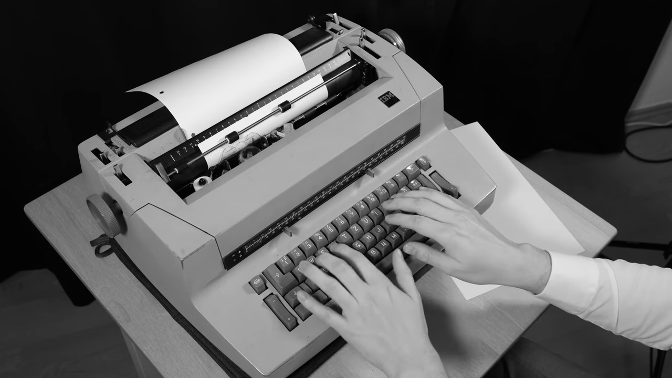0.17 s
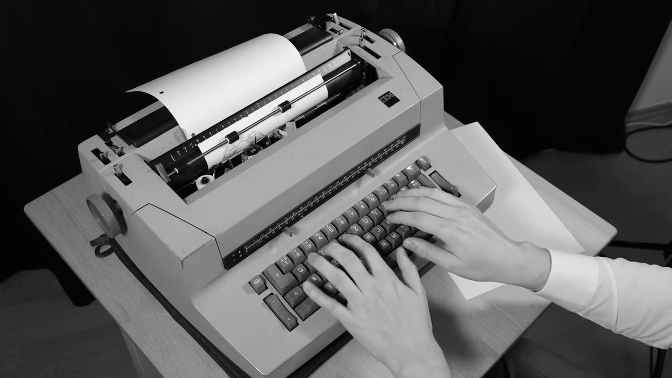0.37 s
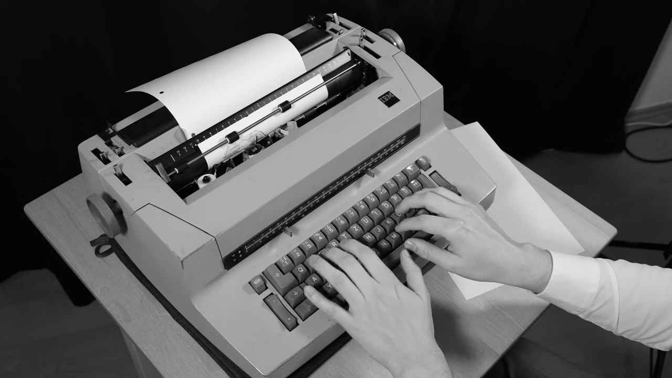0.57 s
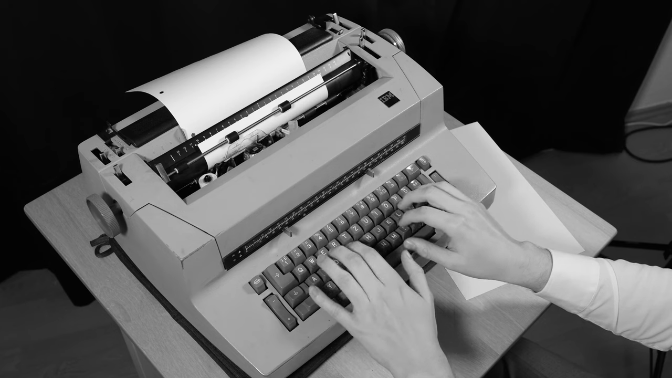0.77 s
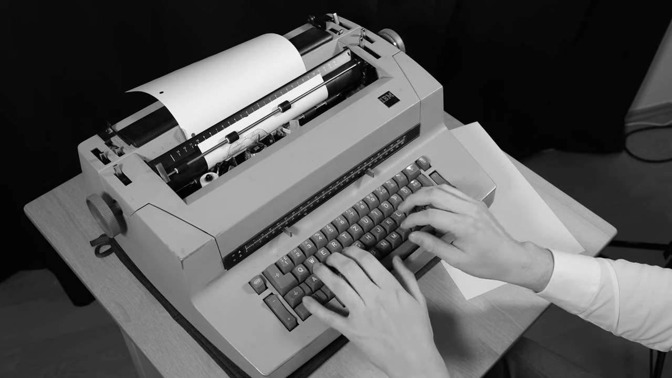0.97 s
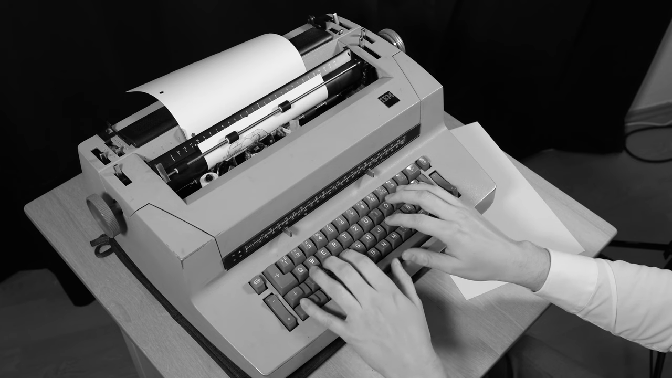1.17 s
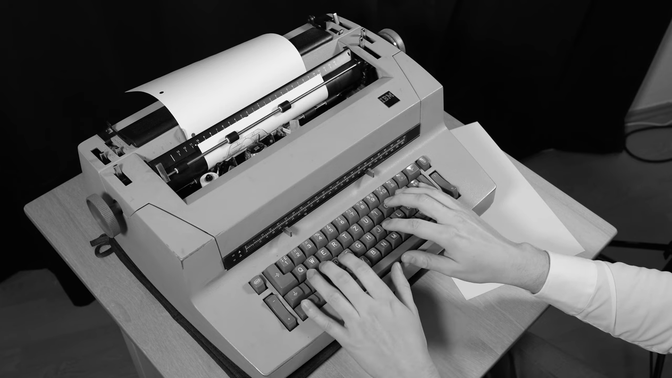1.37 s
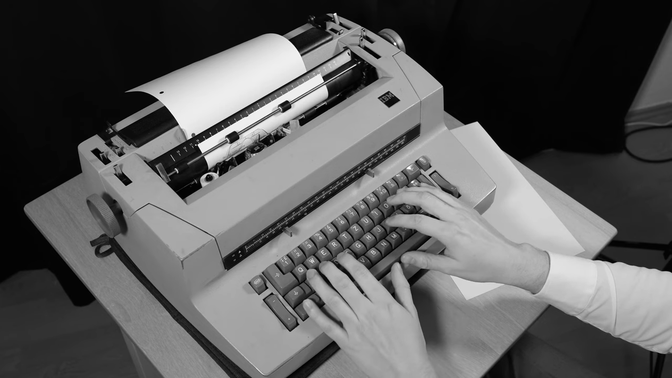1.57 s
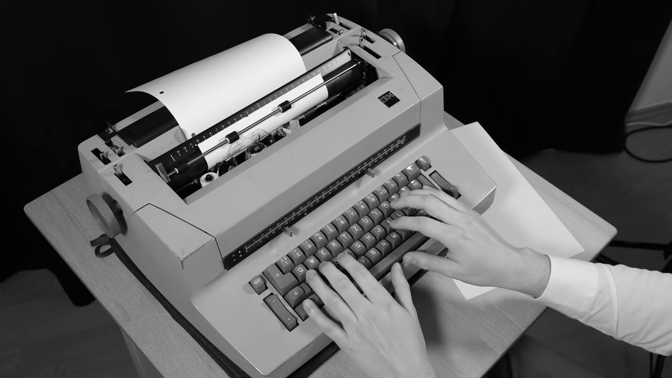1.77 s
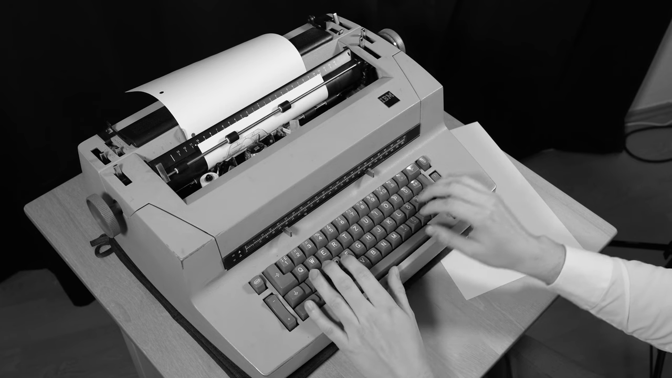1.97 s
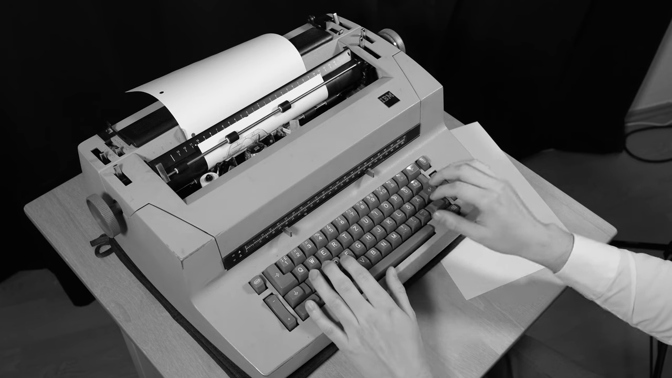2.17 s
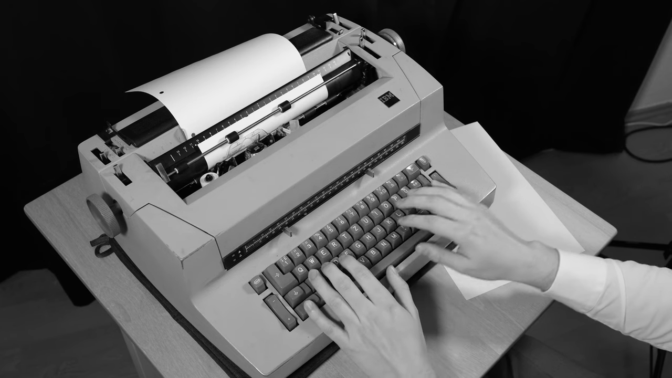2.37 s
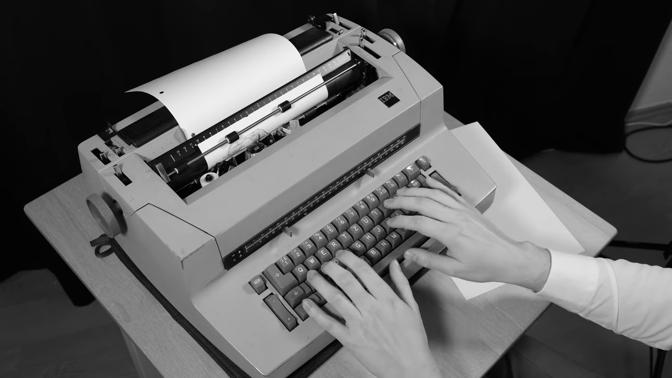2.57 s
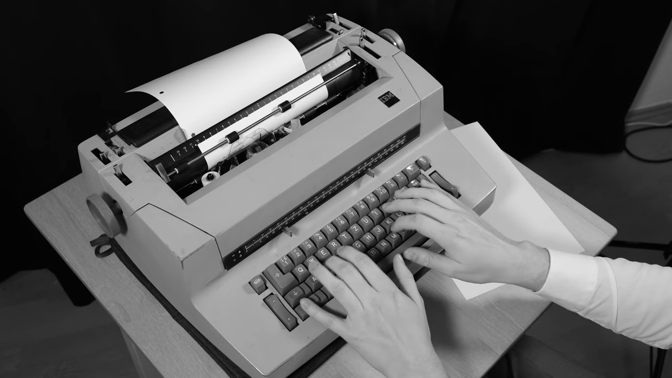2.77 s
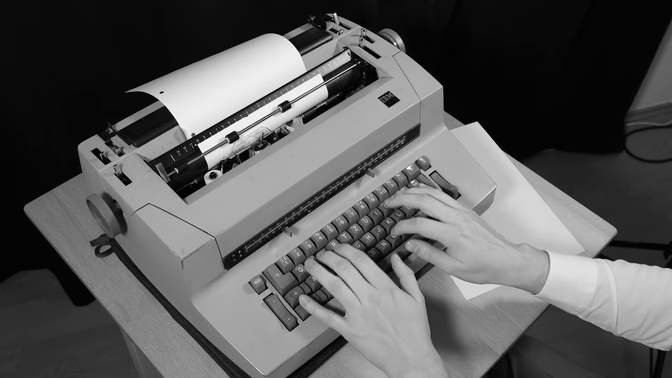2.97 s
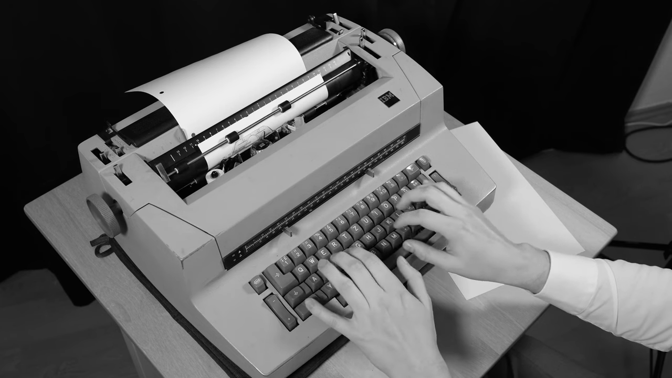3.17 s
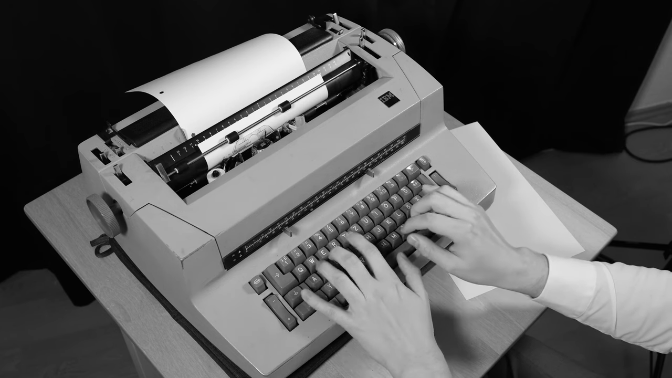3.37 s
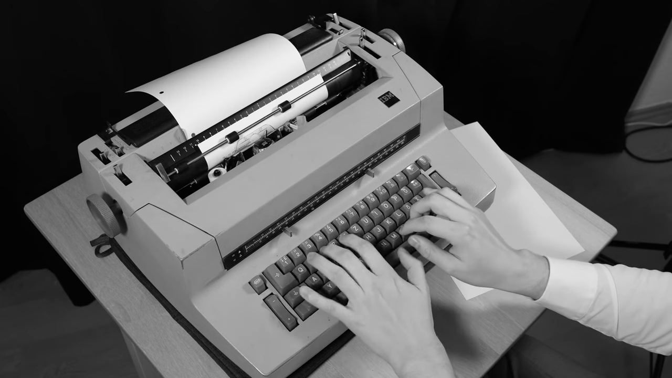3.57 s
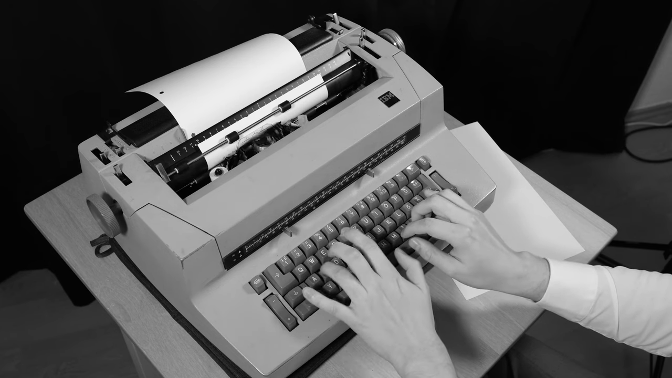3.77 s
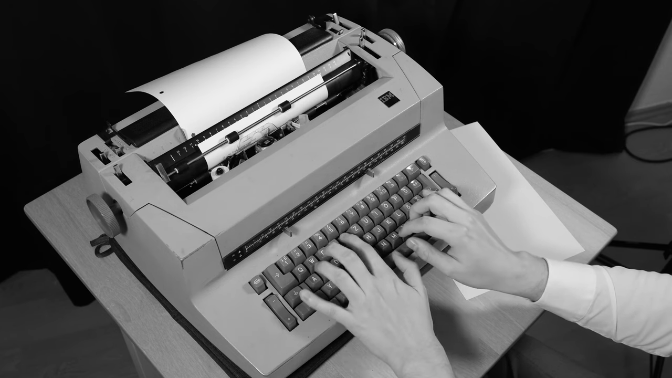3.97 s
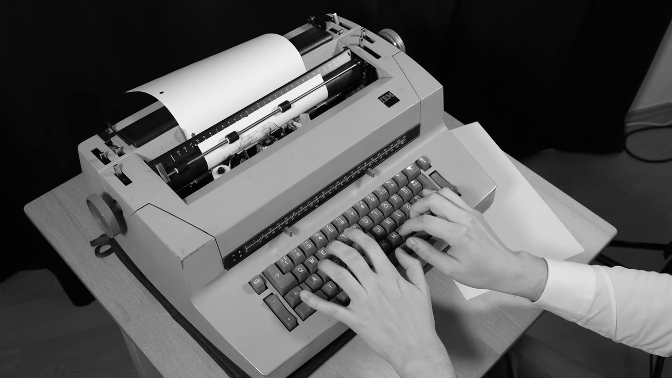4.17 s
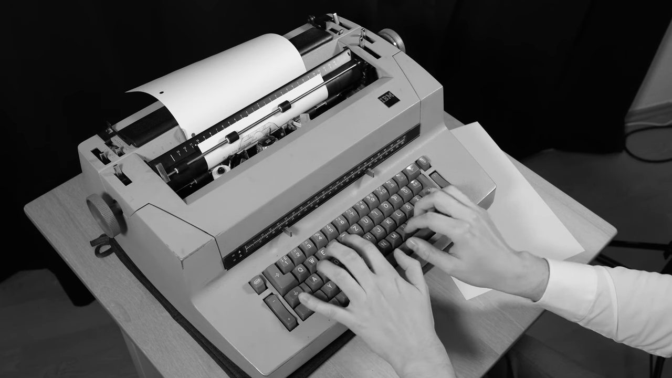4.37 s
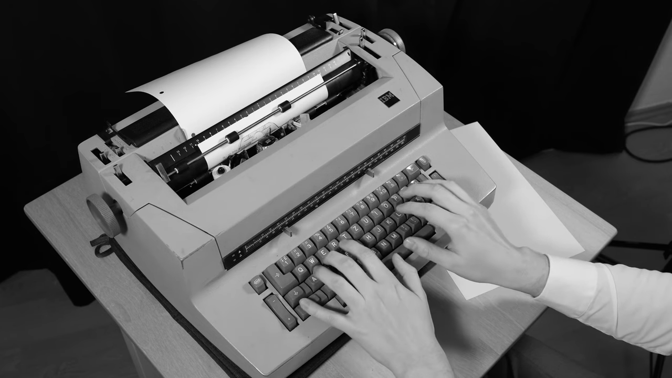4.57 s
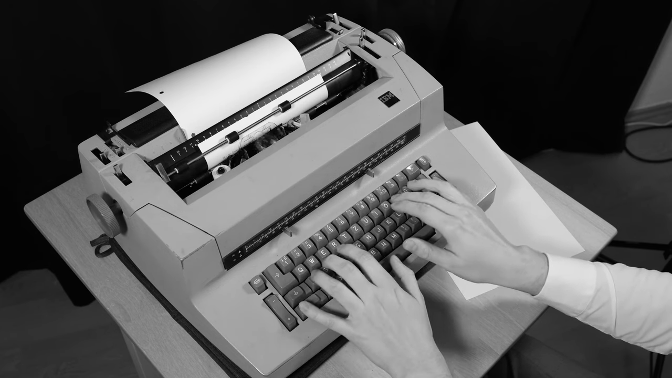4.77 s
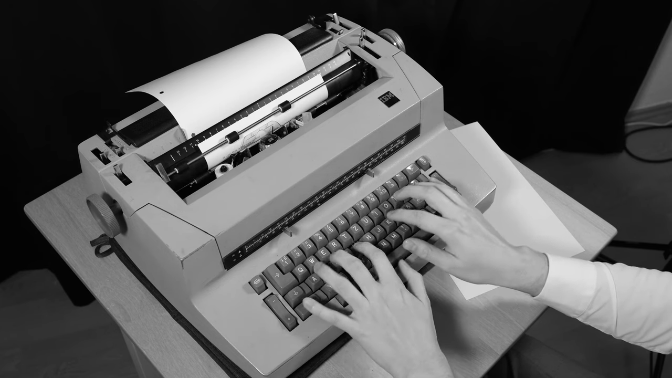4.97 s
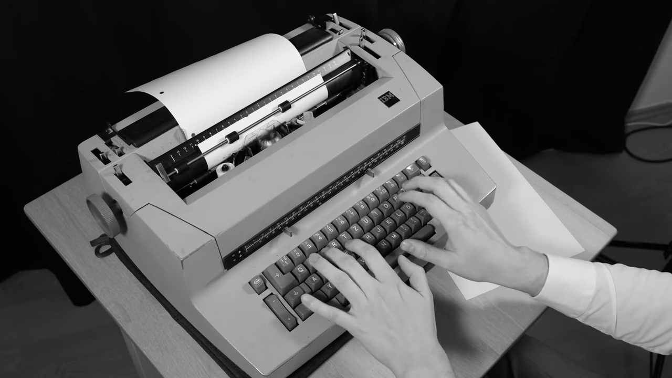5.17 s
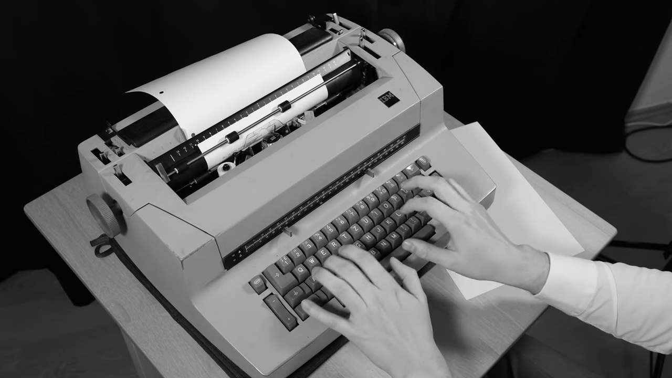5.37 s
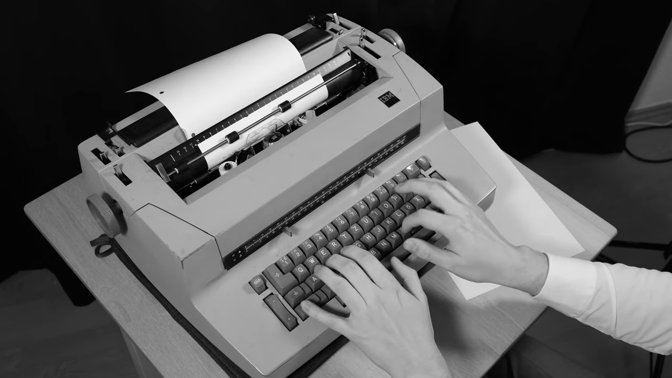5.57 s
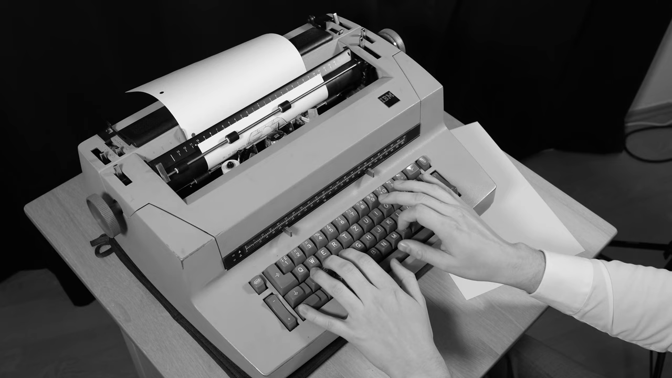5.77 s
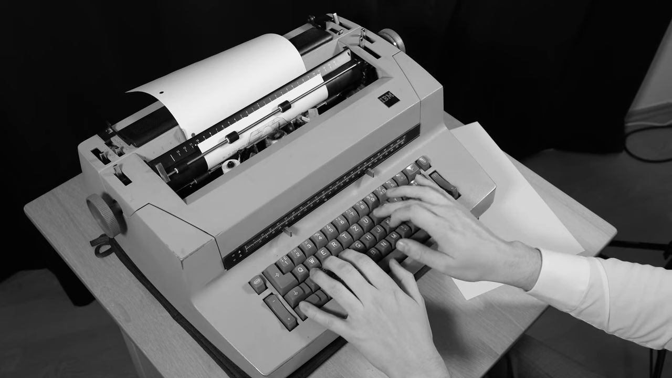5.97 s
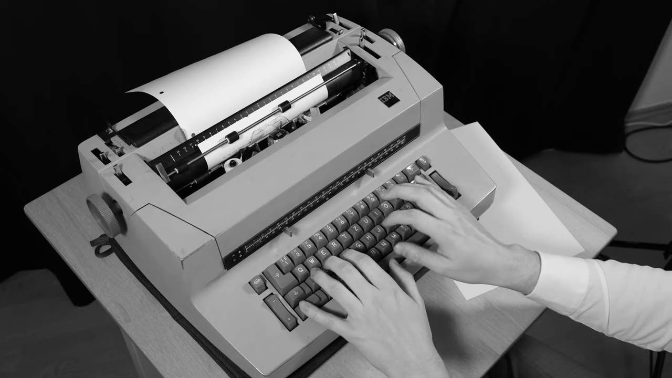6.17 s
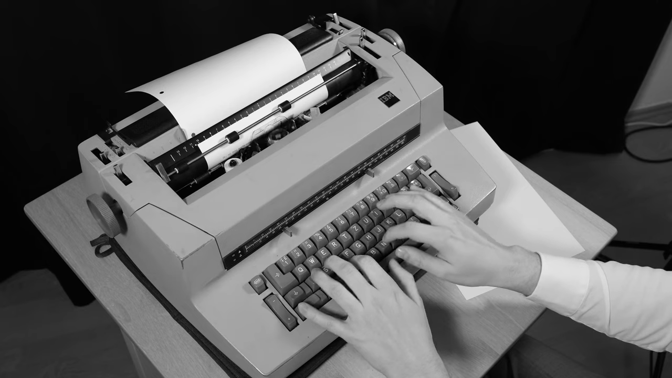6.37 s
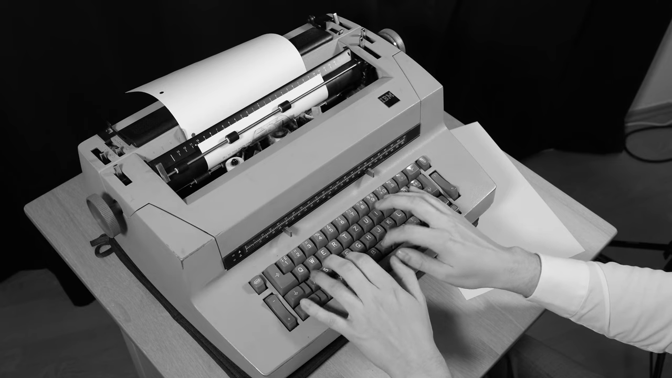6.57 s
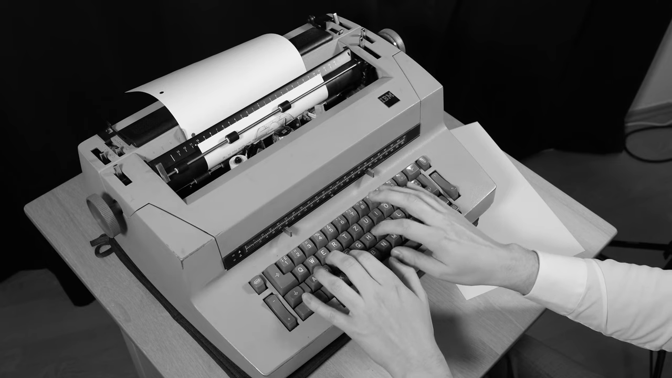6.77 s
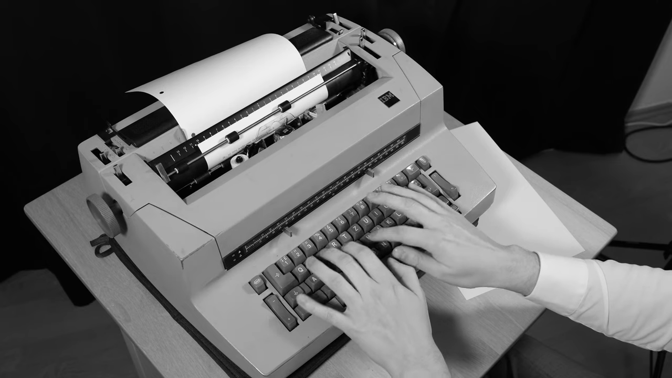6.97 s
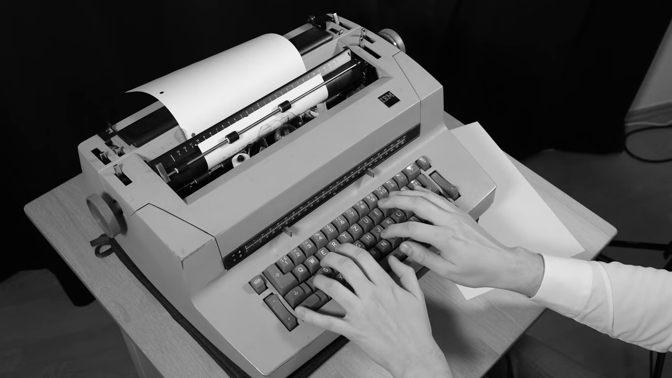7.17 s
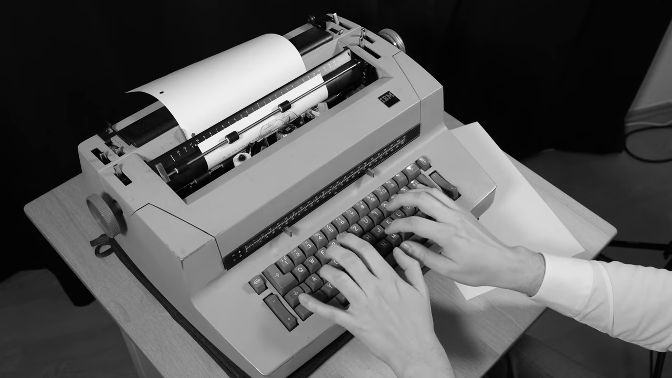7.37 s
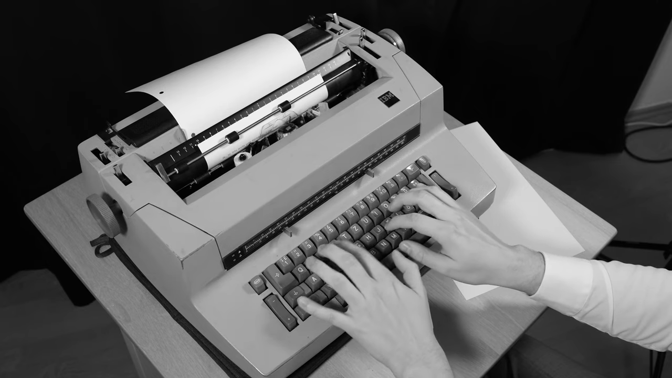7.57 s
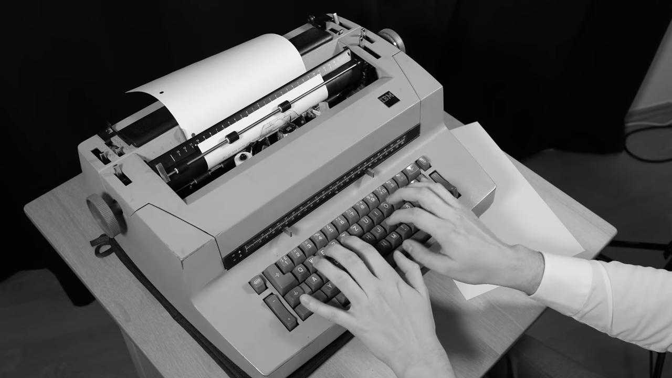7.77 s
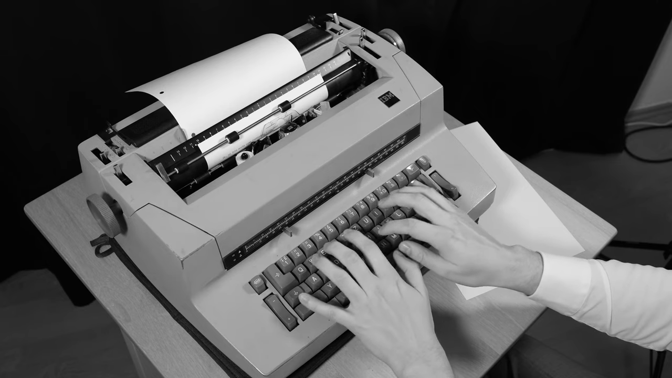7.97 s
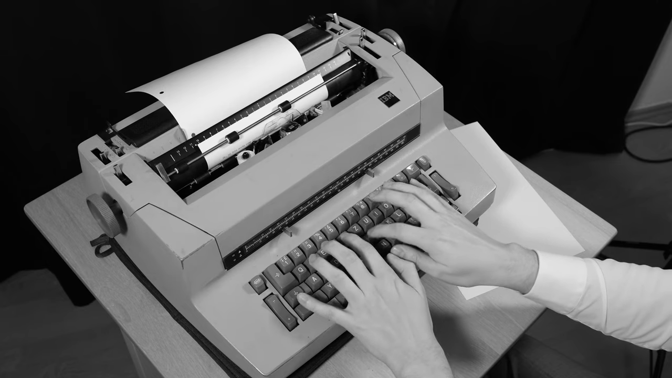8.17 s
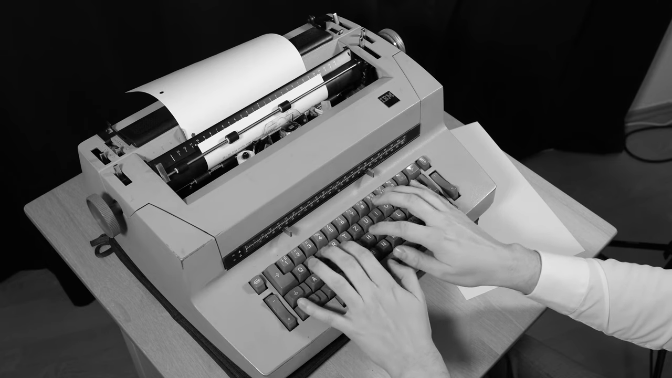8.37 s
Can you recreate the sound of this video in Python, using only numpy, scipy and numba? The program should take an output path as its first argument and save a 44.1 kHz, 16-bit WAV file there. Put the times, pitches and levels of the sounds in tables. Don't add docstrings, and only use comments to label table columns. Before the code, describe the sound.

Very close, loud typewriter strikes in runs, a two-second lull of faint key ticks, then more typing over a throbbing motor hum.

```python
import sys
import numpy as np
from scipy import signal
from scipy.fft import rfft, irfft
from scipy.io import wavfile
from scipy.ndimage import uniform_filter1d
from numba import njit

SR = 44100
rng = np.random.default_rng(int(sys.argv[2]) if len(sys.argv) > 2 else 0)


def transcribe(u):
    v = np.clip(np.atleast_2d(u).T, -1, 1)
    q = np.round(v * 32767).astype(np.int16)
    wavfile.write(sys.argv[1], SR, q)


def magnitude_from_level(level_db):
    exponent = np.asarray(level_db, float) / 20
    return 10 ** exponent


N = 372204
TIME = np.arange(N) / SR

# (type strike [s], strike peak [dB], select rattle [dB], swing rattle [dB])
PRINTS = [(0.0078, -0.5, -20, -16), (0.221, 0.5, -20.5, -15), (0.3378, -2, -27.5, -18.5),
          (0.458, -3, -27, -17.5), (0.6325, -1.5, -22.5, -17.5), (2.7552, -4, -25.5, -23.5),
          (2.829, -6, -33, -23), (2.9203, -7, -33, -21), (3.069, -6, -24.5, -18), (3.5316, -4, -16, -14.5),
          (3.6472, -2, -29.5, -18.5), (3.806, -1.5, -24, -23.5), (4.0376, -2, -20, -14.5),
          (4.8124, 1, -20, -17), (4.909, -2.5, -27, -21), (5.0477, -2.5, -22.8, -17),
          (5.1996, -1, -22.5, -16.5), (5.4972, -3, -24, -22), (5.6722, -18, -22, -15.5),
          (5.9916, -1, -19.5, -17), (6.4248, -5.5, -27.5, -18.5), (6.5966, -2, -23, -23),
          (6.6914, -3, -30.5, -22), (6.963, -3.5, -24.5, -23.5), (7.074, -3, -30.5, -21),
          (7.2283, -2.5, -25, -23), (7.585, -2, -16.5, -16), (8.143, -1.5, -17.5, -14)]
# (time from strike [ms], peak over the rattle [dB], pitch [Hz], spread [ms])
PRINT_KNOCKS = [
    (-37, 1, 644, 5),
    (-28.5, 9, 3000, 0.96),
    (-7.5, 0, 5500, 0.63),
    (16.5, 10.5, 4600, .9),
    (22, 6, 7500, 1.4),
]
# (time [s], peak [dB], pitch [Hz])
CLACKS = [(0.027, -11, 6900), (0.1943, -7, 2920), (0.2076, -10, 5400), (0.2147, -10, 4240),
          (0.2383, -5, 5050), (0.3111, -14, 3080), (0.331, -12, 6740), (0.355, -13, 4300),
          (0.3624, -4, 7500), (0.6072, -10, 3130), (0.6265, -13, 6550), (0.6523, -24, 6100),
          (2.7699, -12, 3700), (2.849, -7, 7400), (2.9206, -17, 3700), (3.04, -11, 3330), (3.063, -7, 5800),
          (3.0851, -14, 3900), (3.4947, -11, 3220), (3.517, -5, 4500), (3.5246, -7, 5200),
          (3.551, -14, 5900), (3.798, -3, 4550), (3.8212, -5, 4440), (4.0003, -12, 4500),
          (4.009, -12, 3040), (4.058, -7, 6260), (4.784, -9, 3320), (4.8049, -13, 4620), (4.8274, -4, 4160),
          (4.88, -13, 2510), (4.9009, -9, 6100), (4.9249, -11, 3600), (5.0694, -2, 6900), (5.193, -9, 5360),
          (5.4674, -15, 3700), (5.4887, -11, 4800), (5.5117, -4, 4020), (5.518, -3, 5200),
          (5.6618, -10, 3700), (5.689, 0, 6530), (5.984, -10, 3800), (6.4477, -5, 7250), (6.5889, -7, 5800),
          (6.6175, -6, 6600), (6.6845, -4, 7150), (6.7096, -15, 7500), (6.947, -17, 5400),
          (6.9788, -17, 5100), (6.9848, -11, 8400), (7.066, -8, 6500), (7.0936, -11, 6560),
          (7.2469, -16, 5300), (7.5564, -8, 3500), (7.5669, -1, 4370), (7.5773, -6, 5660),
          (7.6016, -16, 3800), (8.1033, -8, 3800), (8.1145, -18, 3010), (8.1647, -14, 6660)]
# (time from strike [ms], pitch [Hz], level [dB], t60 [s])
THUMPS = [
    (-17.5, 205, -36, .07),
    (-7, 205, -33.5, 0.077),
    (-37, 291, -33.5, 0.072),
    (-1, 291, -25.5, 0.15),
    (12.5, 291, -31.5, 0.077),
]
# (pitch [Hz], level [dB], t60 [s])
TYPE_MODES = [(2150, 0, .003), (2950, -5, .004), (5100, -6, .002), (1400, -7, .004)]
# (time [s], peak [dB], treble against peak [dB])
LATCHES = [(0.167, -8, -7.5), (0.283, -11.5, -18), (0.403, -18, -21.5), (0.578, -5.5, -12.5),
           (2.6976, 1.5, -10.5), (2.8673, -6.5, -15), (3.013, -11.5, -14), (3.475, -8, -9),
           (3.59, -15, -10), (3.7496, -7, -10), (3.9812, -1, -21), (4.757, 0.5, -17), (4.8523, -8.5, -11),
           (4.993, -10.5, -11.5), (5.1421, -6.5, -14), (5.4416, 0.5, -8.5), (5.615, -4, -18),
           (5.9356, -0.5, -11.5), (6.3693, -2.5, -7), (6.541, -11.5, -8), (6.6367, -11.5, -8),
           (6.9066, -3, -7.5), (7.017, -9.5, -18), (7.173, -9, -7), (7.528, -4, -8.5), (8.0874, 0, -16.5)]
# (pitch [Hz], level [dB], t60 [s])
LATCH_MODES = [(2767, 1, 0.0087), (3920, -1, 0.0028), (5250, -4.5, 0.0083), (5810, 2, 0.0074),
               (6900, 8, 0.0053), (8800, 4, 0.009), (10620, -3.5, 0.023), (12600, -14, 0.0044)]
# (time from strike [ms], rise [ms per 10 dB], fall [ms per 10 dB], treble rattle [dB], low rattle [dB])
LOBES = [
    (-50, 12, 3.5, -6.5, -5.5),
    (-36.5, 6.9, 11.4, 1.5, 2),
    (-22.5, 17, 33.6, -3.5, 7.5),
    (-0.5, 10.3, 8.1, 4.5, 1.5),
    (26.5, 24.6, 3.9, 2.5, 9.5),
    (35, 4, 11, -6.5, -3),
]
# (frequency [Hz], density [dB per Hz])
RATTLE = [(590, -17.5), (1000, -4), (1790, -12.5), (2940, 2), (4570, -3), (9380, -3), (13800, -11.5),
          (16000, -37.5)]
# (pitch [Hz], level [dB], t60 [s])
CASE = [(135.5, -13.5, 0.19), (203.5, 0.5, 0.19), (286.8, 3.5, 0.14), (347.3, -2, 0.081), (482.7, 0, 0.059),
        (608, -8.5, 0.081), (732, -7.5, 0.071), (949, 2.5, 0.04), (1257, -5, 0.079)]
# (time [s], level [dB])
TILT_SPRING = [(0.203, -15.5), (2.904, -26.5), (3.505, -29), (3.555, -33), (3.65, -30.5), (3.791, -25),
               (5.485, -21.5), (6.41, -22), (6.68, -24), (7.066, -23)]
# (time [s], level [dB])
RIBBON_SPRING = [(.2, -29), (.44, -28), (.61, -32), (3.512, -21), (3.63, -30), (5.17, -31), (8.12, -24),
                 (4.79, -27)]
# (time [s], peak [dB], pitch [Hz])
PRESSES = [(.806, -37, 9100), (0.811, -22.5, 8900), (0.834, -17, 5020), (3.1594, -22, 5440),
           (5.599, -30, 2470), (6.082, -25, 3900), (6.099, -20, 7200), (6.35, -24.5, 7310),
           (6.748, -28, 5930), (7.8123, -31, 6950), (7.819, -18.5, 6960), (7.8351, -15, 6640)]
# (time [s], peak [dB])
CAM_BLOWS = [
    (0.8896, -8.5),
    (3.2209, -11.5),
    (5.7808, -13.5),
    (6.1631, -9.5),
    (6.8013, -14),
    (7.895, -8),
]
# (time [s], level [dB], length [ms])
GRIND = [(.815, -34.5, 153), (3.161, -34.5, 133), (5.767, -35.5, 120), (6.085, -35.5, 132),
         (6.786, -34.5, 72), (7.818, -33, 127)]
# (time [s], peak [dB], low ring against peak [dB], chatter [ms])
TOUCHES = [(.9135, -17, -27, 4), (.929, -6.5, -21, 6), (.942, -18, -16, 3), (.948, -13, -9, 3),
           (.9675, -15, -21, 6), (.979, -15, -8, 6), (.995, -25, -14, 3), (1.008, -27, -16, 3),
           (3.244, -24.5, -27, 3), (3.2605, -5, -19.5, 4), (3.272, -11, -8, 4), (3.285, -25, -12, 3),
           (3.299, -23, -17, 3), (3.308, -16.5, -16, 2), (3.327, -21.5, -16, 1.5), (3.332, -24, -18, 1.5),
           (3.348, -27, -9, 4), (5.83, -11.5, -23, 4), (5.838, -15, -6, 5), (5.845, -11.5, -20, 2),
           (5.8575, -17, -10, 2), (5.8645, -14, -22, 3), (5.874, -20, -12.5, 6), (5.908, -21, -14, 1.5),
           (6.1845, -22, -22, 2), (6.2045, -7, -25, 3), (6.213, -15.5, -3, 4), (6.223, -15, -13, 5),
           (6.242, -13, -20, 2), (6.2525, -11.5, -10.5, 2), (6.267, -22, -8, 2), (6.294, -31, -19, 2),
           (6.305, -31, -15, 2), (6.85, -12, -18, 3), (6.857, -11.5, -8.5, 7), (6.8685, -17, -12, 3),
           (6.8845, -18, -16, 3), (6.895, -21, -8, 3), (7.9485, -6.5, -14, 5), (7.959, -9, -13, 5),
           (7.9835, -9, -22, 1.5), (7.994, -12.5, -9, 4), (8.004, -15, -14, 1.5), (8.009, -20, -14, 2),
           (8.018, -28, -21, 2)]
# (pitch [Hz], level [dB], t60 [s])
PAWL_MODES = [(2095, 0.5, .04), (2900, -1, .033), (3430, -4.5, .03), (3905, -1, .04), (4640, -7, .025),
              (5770, -9, .012), (6100, -11, .025), (7200, -7, .015), (8300, -8, .015), (10000, -8, .008),
              (11120, -4, .011), (11550, -4, .008), (12800, -7, .009), (14300, -11, .008)]
# (time [s], level [dB], length [ms], upper partials [dB])
FLIGHTS = [(.931, -35, 26, 15), (.975, -26.5, 32, -1.5), (3.264, -25.5, 27, 0), (5.833, -27, 24, 0),
           (5.868, -32, 16, 3), (6.207, -20.5, 22, -5), (6.253, -29, 18, -2), (6.857, -29, 21, 0),
           (6.885, -31, 21, 2), (7.949, -15, 27.5, -1), (7.992, -20.5, 20.5, -1)]
# (pitch [Hz], level [dB])
FLIGHT_MODES = [(2095, -2.5), (2920, -9), (3430, -12), (3890, -7.5), (4640, -19)]
# (time [s], peak [dB], pitch [Hz])
FINGERS = [(1.2134, -36, 3830), (1.225, -24, 7100), (1.258, -37, 10500), (1.345, -50, 6900),
           (1.359, -44, 6900), (1.49, -48, 2300), (1.529, -42, 1500), (1.74, -47, 2500), (2.19, -47, 5000),
           (1.4665, -45, 6600), (1.683, -34.5, 1740), (1.7139, -39, 2200), (1.827, -31, 5390),
           (1.8414, -35, 3850), (1.878, -32, 11200), (2.0447, -31.5, 1690), (2.268, -32, 1620),
           (2.2986, -38, 9000), (2.318, -48, 4000), (2.376, -29.5, 1780), (2.376, -26.5, 13140),
           (2.461, -44, 6960), (2.479, -25.5, 6900), (2.6614, -38, 2360), (4.366, -41, 2440),
           (4.398, -37.5, 3530), (4.7438, -15.5, 6500), (8.289, -39, 9000), (8.292, -36, 7900),
           (8.3005, -25, 9000), (8.367, -43, 9100), (8.371, -23.5, 6600), (8.376, -27, 6000),
           (8.386, -30, 8900), (8.404, -21, 7060), (8.411, -18.5, 3580)]
# (pitch [Hz], level [dB], t60 [s])
LEVER_MODES = [(2240, -14.5, .03), (3085, -9, .022), (3800, -7, 0.037), (6600, -5, 0.021),
               (6960, 2, 0.0061), (9760, -3.5, .015), (11200, -2, 0.017), (13100, -6, .01)]
# (pitch [Hz], level [dB rms])
HUM = [(67, -60), (101, -57), (123.8, -69), (242.2, -55), (371.4, -87), (436.0, -77), (484.5, -60),
       (651.4, -67.5), (699.8, -70.5), (753.7, -84), (969.0, -66.5)]
# (frequency [Hz], density [dB per Hz])
WHIRR = [(20, -34), (140, -18), (241, 0.5), (388, -18.5), (949, -21.5), (1660, -32), (5530, -40.5),
         (16000, -49.5)]
# (pitch [Hz], level [dB], t60 [s])
BELT_MODES = [(2290, 0, .03), (2360, -2, .03), (5550, -9, .015), (1420, -5, .02)]
# (pitch [Hz], level [dB], t60 [s])
TABLE = [(60.94, -48, 1.8), (67.55, -50.5, 1.9)]

CLUTCH_MS = -66.5
RETURN_DB, RETURN_PER_SWING_DB = -25.5, -0.1454
THUMP_DB = -24.5
TURN_S, TURN_START_S = 0.1195, 0.042


@njit
def ring(start, hz, t60, size, out):
    for k in range(len(start)):
        step = np.exp(2j * np.pi * hz[k] / SR - np.log(1000) / (t60[k] * SR))
        z = size[k] + 0j
        first = max(int(start[k] * SR), 0)
        last = min(int((start[k] + t60[k]) * SR), len(out))
        for i in range(first, last):
            out[i] += z.imag
            z *= step
    return out


def grains(start, hz, t60, db, sign):
    parts = np.broadcast_arrays(start, hz, t60, magnitude_from_level(db) * sign)
    start, hz, t60, size = (np.ravel(a) * 1.0 for a in parts)
    heard = np.abs(size) > 1e-5
    hz = np.clip(hz, 20, 0.45 * SR)
    return ring(start[heard], hz[heard], np.abs(t60[heard]) + 1e-4, size[heard], np.zeros(N))


def struck(s, db, modes, scatter_db, smear_s):
    hz, mode_db, t60 = np.transpose(modes)
    late, detune, force = rng.standard_normal((3, len(s), len(hz)))
    start = s[:, None] + smear_s * np.abs(late)
    return grains(start, hz * (1 + 0.0044 * detune), t60, db + mode_db + scatter_db * force, 0.96)


def chatter(s, db, modes, length_ms, fade_db, smear_s=0.0014, count=6):
    out = struck(s, db, modes, scatter_db=1.5, smear_s=smear_s)
    for late in rng.random((count, len(s))):
        bounce_db = db + fade_db * late[:, None]
        out += struck(s + late * length_ms / 1000, bounce_db, modes, scatter_db=1.5, smear_s=smear_s)
    return out


def knocks(s, db, hz, spread_ms, fade_db=-14, count=48, wide=0.718):
    s, db, hz, spread_ms = (a[:, None] for a in np.broadcast_arrays(s, db, hz, spread_ms))
    detune, force, sign = rng.standard_normal((3, len(s), count))
    late = rng.random((len(s), count))
    f = hz * np.exp(wide * detune)
    grain_db = db - 10 * np.log10(count / spread_ms) + fade_db * late + 3 * force
    t60 = np.minimum(45 / f, 0.022) + 0.009
    return grains(s + 3e-3 * spread_ms * late, f, t60, grain_db, np.sign(sign))


def on_log(table, hz):
    f, db = np.transpose(table)
    return np.interp(np.log(np.maximum(hz, 1)), np.log(f), db)


def walk(rate):
    k = int(SR / rate)
    held = np.repeat(rng.standard_normal(N // k + 1), k)
    x = uniform_filter1d(uniform_filter1d(held, k), k)[:N]
    return x / x.std()


def effort(t):
    ms = np.arange(CLUTCH_MS, 90, 0.5)
    cam = 1e-12
    for at, rise, fall, *db in LOBES:
        slope = np.where(ms < at, (at - ms) / rise, (ms - at) / fall)
        cam = cam + magnitude_from_level(2 * (np.array(db)[:, None] - 10 * slope))
    power = np.full((2, len(t)), 1e-12)
    for s, _, select, swing in PRINTS:
        at = (t - s) * 1000
        near = (at > ms[0]) & (at < ms[-1])
        back = RETURN_DB + RETURN_PER_SWING_DB * swing
        stage = np.interp(at[near], [-33, -13, 20], [select, swing, back])
        power[0, near] += magnitude_from_level(2 * stage) * np.interp(at[near], ms, cam[0])
        power[1, near] += magnitude_from_level(stage + THUMP_DB) * np.interp(at[near], ms, cam[1])
    return 10 * np.log10(power)


def type_strikes():
    s, db, *_ = np.transpose(PRINTS)
    out = struck(s, db[:, None] - 8, TYPE_MODES, scatter_db=1, smear_s=0)
    out -= struck(s + 0.00023, db[:, None] - 5, TYPE_MODES, scatter_db=1, smear_s=0)
    out += struck(s + 0.004924, THUMP_DB + 1.5, CASE[3:], scatter_db=2.0, smear_s=0.00193)
    ms, hz, thump_db, t60 = np.transpose(THUMPS)
    push_db = thump_db + 1.3 * rng.standard_normal((len(s), len(hz)))
    out += grains(s[:, None] + ms / 1000, hz, t60, push_db, 1)
    return out + knocks(s + 0.0049, THUMP_DB + 6.0, 520, 1.1, count=6)


def cycle_knocks():
    s = np.array(PRINTS)[:, 0]
    out = np.zeros(N)
    for ms, over_db, hz, spread_ms in PRINT_KNOCKS:
        at = s + ms / 1000 + 0.0012 * rng.standard_normal(len(s))
        db = effort(at)[0] + over_db + 1.8 * rng.standard_normal(len(s))
        out += knocks(at, db, hz, spread_ms, count=90, wide=0.25 if hz < 1000 else 0.7)
    s, db, hz = np.transpose(CLACKS)
    return out + knocks(s, db - 2.5, hz, 0.7, count=70, wide=0.51)


def latches():
    s, db, treble = np.transpose(LATCHES)
    tilt = np.where(np.array(LATCH_MODES)[:, 0] > 5500, treble[:, None] + 6, 0)
    snap = chatter(s + 0.0004, db[:, None] - 10.0 + tilt, LATCH_MODES, 1.3,
                   fade_db=-2.5, smear_s=0.00014, count=1)
    snap = signal.sosfilt(signal.butter(2, 1300, "high", fs=SR, output="sos"), snap)
    return snap + knocks(s - 0.0095, -24 + 1.5 * db, 6500, 4.4, fade_db=0, count=80)


def springs():
    s, db = np.transpose(TILT_SPRING)
    out = grains(s, 9490, 0.07, db + 2.0, 0.95)
    s, db = np.transpose(RIBBON_SPRING)
    return out + grains(s, 13410, 0.05, db + 2.0, 0.95)


def rattle(count=80000, case_count=6000):
    t = rng.random(count) * N / SR
    hz = 500 * 32 ** rng.random(count)
    treble, low = effort(t)
    share = np.clip(np.log2(hz / 700) / 1.6, 0, 1)
    db = share * treble + (1 - share) * (low + 1.2)
    db += on_log(RATTLE, hz) + 13 * np.log10(hz / 3000) - 7.4
    db += 3.31 * np.minimum(rng.exponential(size=count), 4.0)
    loose = grains(t, hz, 16 / hz + 0.0022, db, np.sign(rng.standard_normal(count)))

    t = rng.random(case_count) * N / SR
    hz, mode_db, t60 = np.array(CASE)[rng.integers(len(CASE), size=case_count)].T
    detune, size = rng.standard_normal((2, case_count))
    db = effort(t)[1] + mode_db - 13.5 - 3.85 * (hz < 330)
    return loose + grains(t + 2.478 / hz, hz * (1 + 0.021 * detune), t60, db, size)


def space_linkage():
    s, db = np.transpose(CAM_BLOWS)
    at = np.r_[s, s - 0.0172]
    cam = [at, np.r_[db, db - 4], np.full(len(at), 3407)]
    s, db, hz = np.hstack([np.transpose(PRESSES), cam])
    spread_ms = 5.6
    out = knocks(s, db, hz, spread_ms + 0.3, fade_db=-12, count=300)
    out += struck(s + 0.0062, db[:, None] - 17.0, CASE, scatter_db=1.0, smear_s=0.0088)
    out += knocks(s + 0.0042, db - 13.5, 900, spread_ms, count=30)
    s, db, length_ms = np.transpose(GRIND)
    return out + knocks(s, db, 2300, length_ms / 3, fade_db=4.5, count=1500)


def pawl():
    s, db, low, length_ms = np.transpose(TOUCHES)
    modes = np.array(PAWL_MODES)
    level = db[:, None] + np.where(modes[:, 0] < 5000, low[:, None] + 1, 0)
    out = chatter(s, level - 10.0, modes, length_ms, fade_db=6.5, smear_s=0.00049, count=2)
    free = modes * [1, 1, 1.9]
    out += struck(s + 0.008, level - 39, free, scatter_db=2.5, smear_s=0.003)
    return out + knocks(s, db - 8.0, 10500, length_ms / 3 + 0.27, fade_db=3, count=200)


def free_ring():
    swell_s, damp_s = 0.0064, 0.0091
    out = np.zeros(N)
    for s, db, flight_ms, upper_db in FLIGHTS:
        at = slice(int(s * SR), int((s + flight_ms / 1000) * SR))
        t = TIME[at] - s
        gate = np.clip(t / swell_s, 0, 1) * np.clip((t[-1] - t) / damp_s, 0, 1)
        for hz, mode_db in FLIGHT_MODES:
            force, detune = rng.standard_normal(2)
            level = magnitude_from_level(db + mode_db + upper_db * (hz > 2500) + 0.8 * force)
            out[at] += level * gate * np.sin(2 * np.pi * hz * (1 + 0.0032 * detune) * t)
    return out


def fingers():
    s, db, hz = np.transpose(FINGERS)
    away_db = -5 * np.abs(np.log2(np.array(LEVER_MODES)[:, 0] / hz[:, None]))
    tick = knocks(s, db - 5.5, hz ** 0.7 * 11, 2.0, count=120)
    return tick + chatter(s, db[:, None] - 13 + away_db, LEVER_MODES, 3.0, fade_db=-8, count=2)


def load():
    recover_s = 0.11
    pulls = np.zeros(N)
    s = np.r_[np.array(PRINTS)[:, 0], np.array(CAM_BLOWS)[:, 0]]
    pulls[(s * SR).astype(int)] = 1
    keep = np.exp(-1 / (recover_s * SR))
    return np.tanh(uniform_filter1d(signal.lfilter([1], [1, -keep], pulls), SR // 12))


def hum(turn):
    pull = load()
    run_s = np.cumsum(1 - 0.11 * pull) / SR
    out = np.zeros(N)
    for hz, db in HUM:
        deep = hz < 150
        throb = 1 + 0.29 * np.cos(turn + 0.6 * walk(3.2)) * (hz > 150)
        duck_db = -pull * (2.2 if 90 < hz < 110 else 1)
        waver_db = (0.7 if deep else 3.5) * walk(9)
        phase = 2 * np.pi * hz * (run_s if deep else TIME) + 0.38 * walk(4.2)
        out += np.sqrt(2) * magnitude_from_level(db + duck_db + waver_db) * throb * np.sin(phase)
    return out


def whirr(turn):
    hz = np.fft.rfftfreq(N, 1 / SR)
    spectrum = rfft(rng.standard_normal(N)) * magnitude_from_level(on_log(WHIRR, hz))
    spectrum *= magnitude_from_level(-45.5) / irfft(spectrum, N).std()
    drone = irfft(spectrum * (hz < 330), N)
    hiss = irfft(spectrum, N) - drone
    return drone * magnitude_from_level(-1.0 + 1.7 * walk(22) + 1.2 * np.cos(turn)) + hiss * magnitude_from_level(0.4 * walk(25))


def motor():
    turn = 2 * np.pi * (TIME - TURN_START_S) / TURN_S
    s = np.arange(TURN_START_S, N / SR, TURN_S)
    return hum(turn) + whirr(turn) + struck(s, -51, BELT_MODES, scatter_db=1.5, smear_s=0.009)


def table():
    hz, db, t60 = np.transpose(TABLE)
    strikes, blows = np.array(PRINTS)[:, :1], np.array(CAM_BLOWS)[:, :1]
    return grains(strikes - 0.0036, hz, t60, db, 0.83) - grains(blows, hz, t60, db - 4.5, 1)


def room(x):
    t60_s, treble_t60_s, tail_db = 0.38, 0.2, -12.5
    t = TIME[:SR // 2]
    noise = rng.standard_normal(len(t))
    dull = signal.sosfilt(signal.butter(1, 4000, fs=SR, output="sos"), noise)
    tail = dull * magnitude_from_level(-60 * t / t60_s) + (noise - dull) * magnitude_from_level(-60 * t / treble_t60_s)
    tail *= t > 0.004
    tail /= np.sqrt(np.sum(tail ** 2))
    return x + magnitude_from_level(tail_db) * signal.fftconvolve(x, tail)[:N]


def scene():
    printing = type_strikes() + cycle_knocks() + latches() + springs() + rattle()
    spacing = space_linkage() + pawl()
    machine = printing + spacing + fingers()
    machine = signal.sosfilt(signal.butter(4, 165, "high", fs=SR, output="sos"), machine)
    return (room(machine) + free_ring() + motor() + table())[None]


def band_limit(x):
    return signal.sosfilt(signal.butter(12, 17000, fs=SR, output="sos"), x)


def record(dry):
    full = np.clip(dry, -0.97, 0.97)
    mix = signal.sosfilt(signal.ellip(10, 0.5, 80, 15800, fs=SR, output="sos"), full)
    return band_limit(mix)


dry = scene()
out = record(dry)
transcribe(out)
```